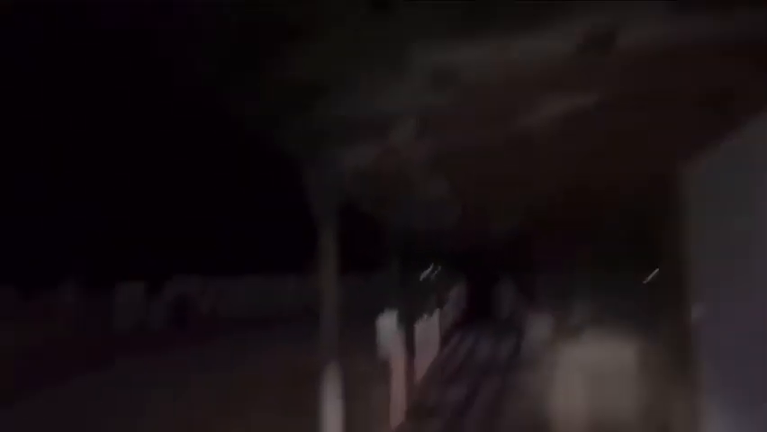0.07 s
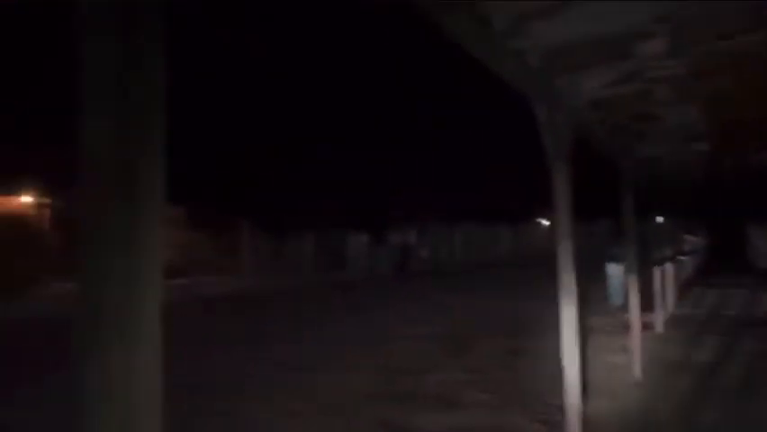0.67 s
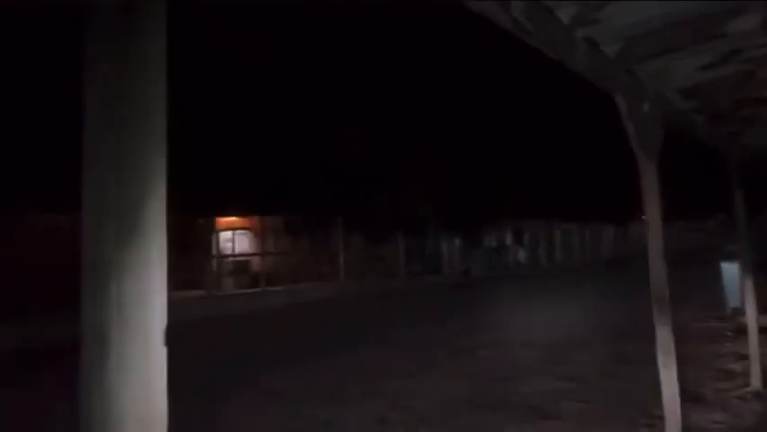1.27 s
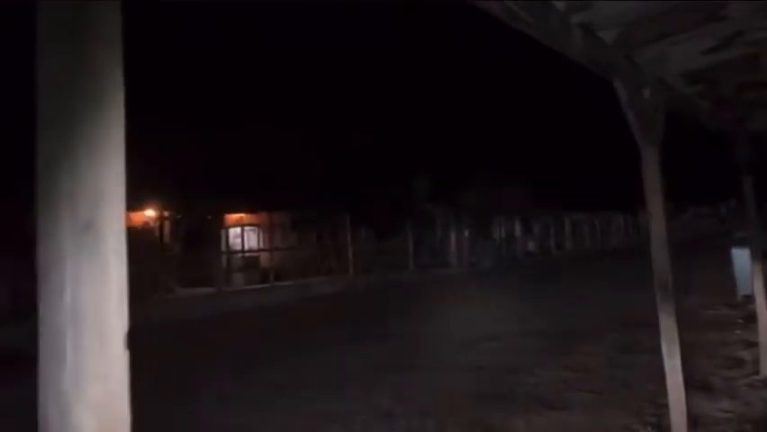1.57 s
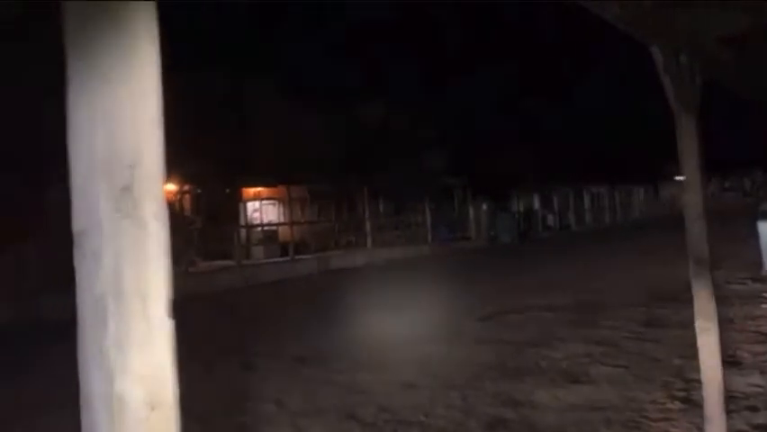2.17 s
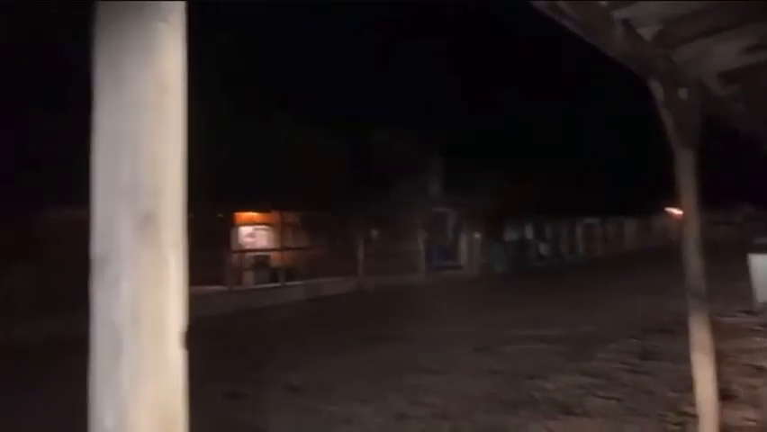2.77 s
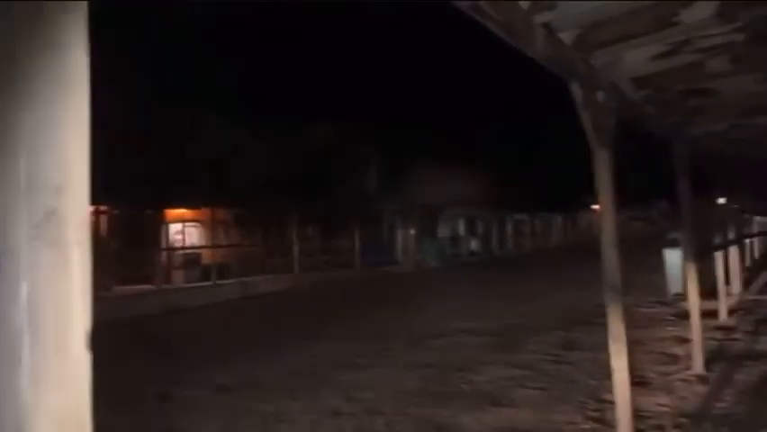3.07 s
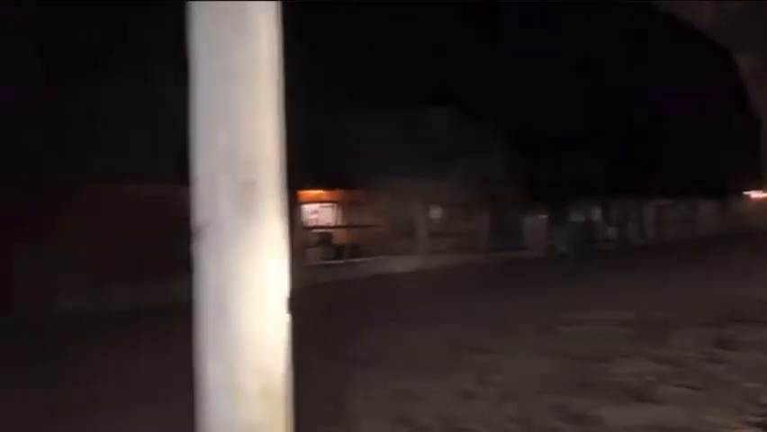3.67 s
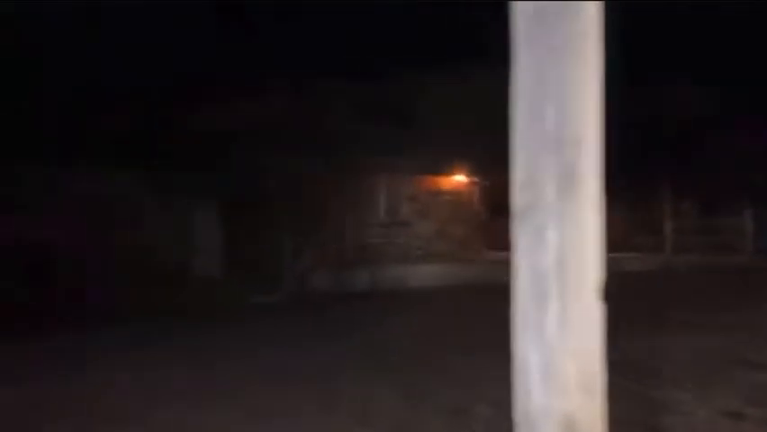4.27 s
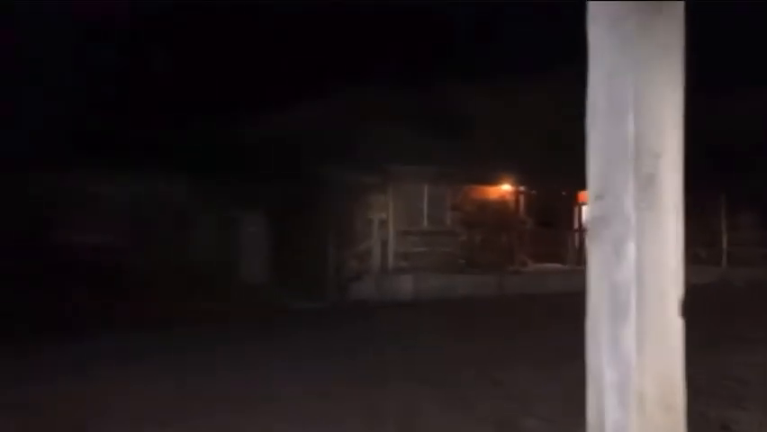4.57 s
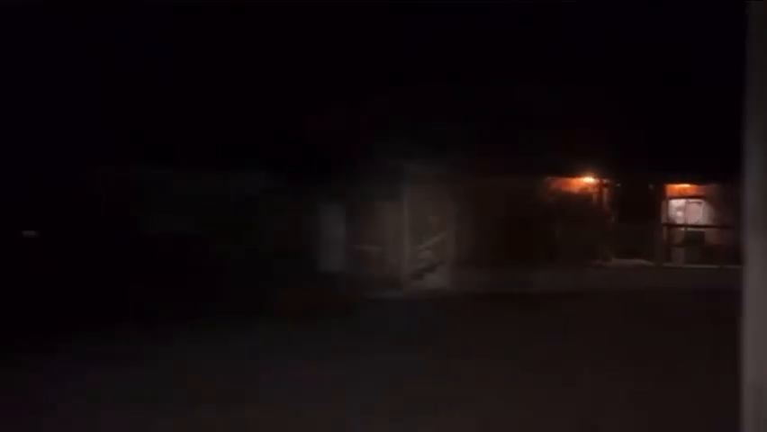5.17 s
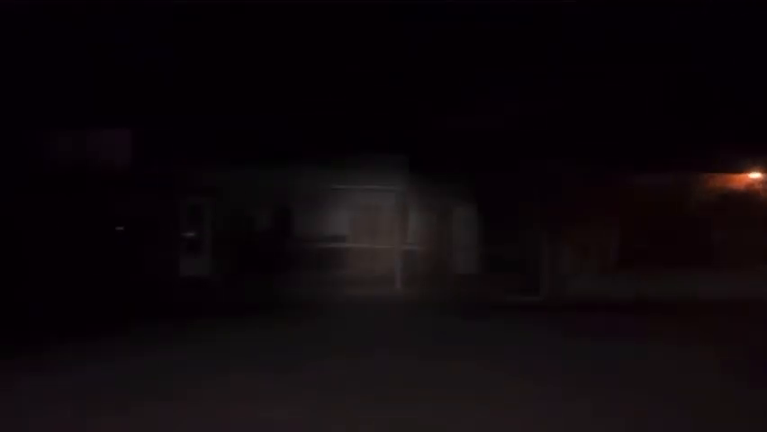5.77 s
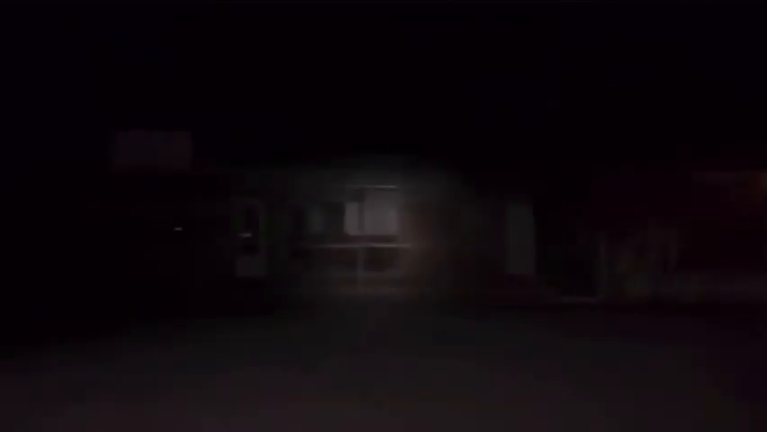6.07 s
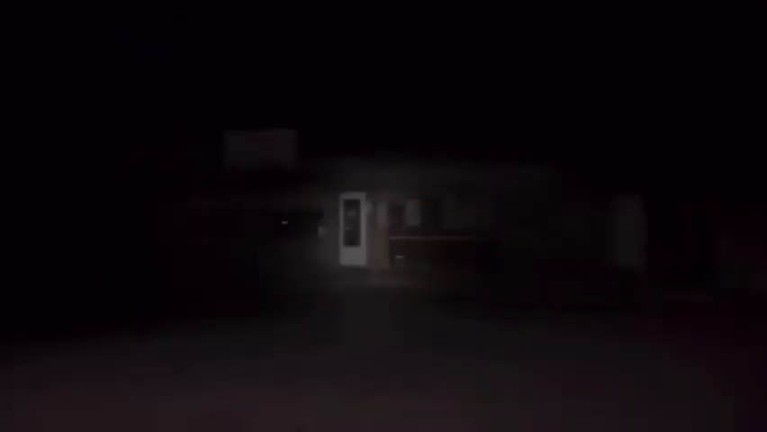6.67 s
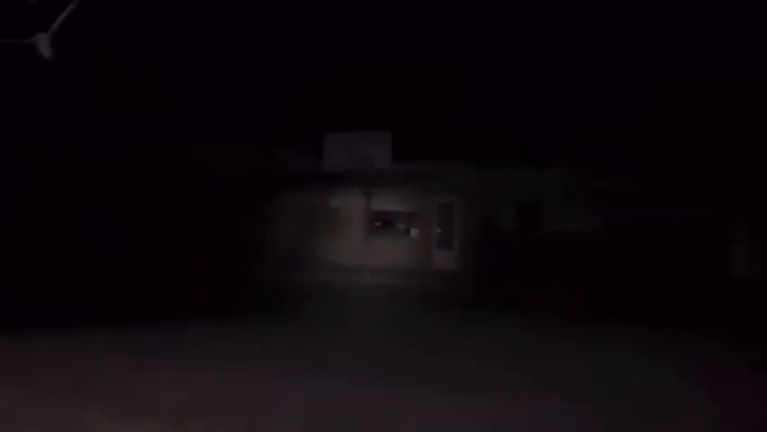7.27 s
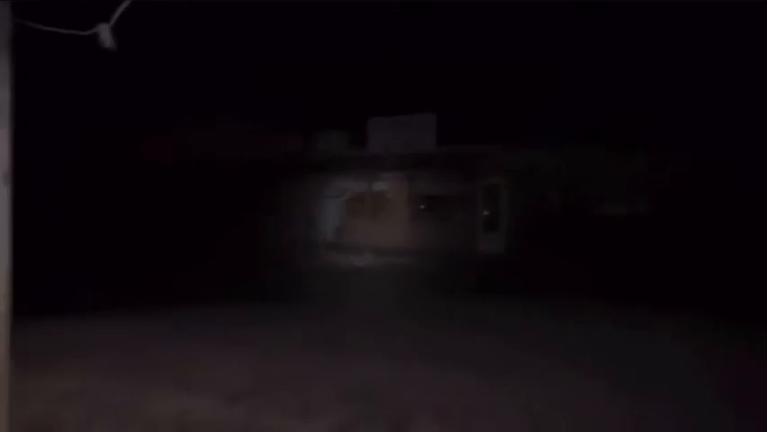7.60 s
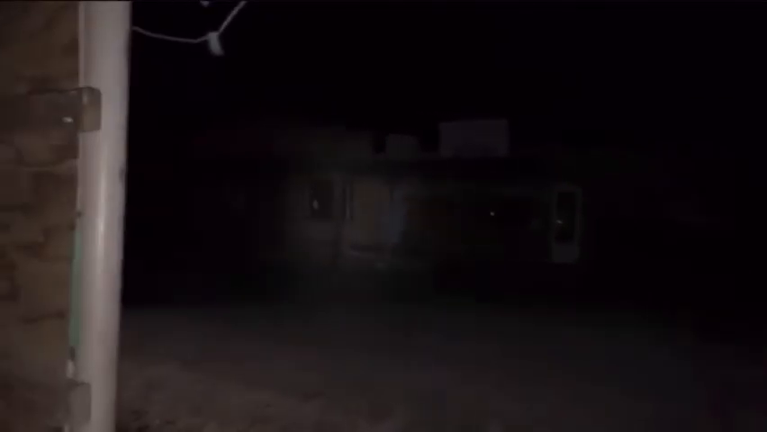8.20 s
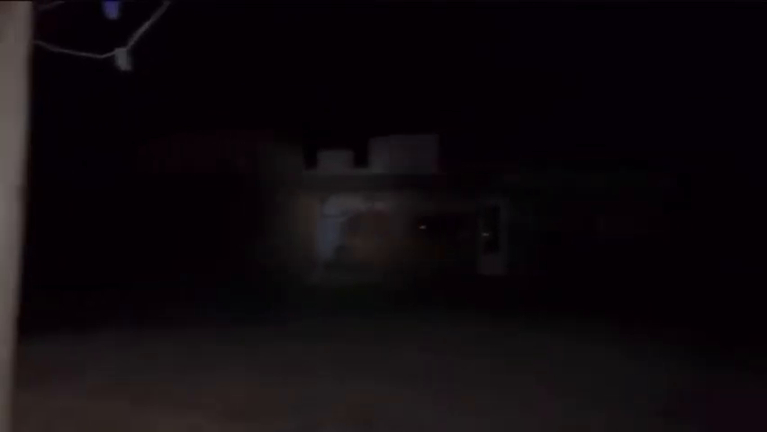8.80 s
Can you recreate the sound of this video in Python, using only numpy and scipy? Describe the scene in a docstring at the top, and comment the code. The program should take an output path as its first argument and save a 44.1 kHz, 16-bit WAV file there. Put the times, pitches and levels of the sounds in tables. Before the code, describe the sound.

Outdoors on a quiet night, a handheld microphone sputters with close electrical clicks, short rattles and a few soft thumps over low rumble. A shoe rasps on sandy ground near the start. The crackling stays dense for more than half the time, then breaks off into a few lone clicks, while the hand shifts with a deep rumble and a far cricket trills very faintly.

```python
"""On a quiet porch at night, over low rumble and faint hiss, a hand shifts and a microphone starts to
crackle. Each click is an electrical discharge, a dry spike that leaves the signal sagging; now and then
the bias jumps with a dull pop. From one second on, shoes give a few gritty scuffs by friction.
Past the middle a far cricket begins to trill, and the crackle thins out to a few clicks,
leaving the cricket, deep wobbles of the hand and faint last scuffs."""
import sys
import numpy as np
from scipy import signal
from scipy.fft import rfft, irfft, next_fast_len
from scipy.io import wavfile

SR = 44100
rng = np.random.default_rng(int(sys.argv[2]) if len(sys.argv) > 2 else 0)


def materialize(psi):
    """Save the field psi as 16-bit PCM at rate SR to the path in sys.argv[1].

    A 1-D psi becomes a single channel; in a 2-D psi each row is a channel.
    """
    bounded = np.clip(np.atleast_2d(psi).T, -1, 1)
    quanta = np.round(bounded * 32767).astype(np.int16)
    wavfile.write(sys.argv[1], SR, quanta)


N = 394254
TIME = np.arange(N) / SR
BAND_LIMIT_HZ = 11413


def amp(db):
    """Amplitude ratio of a level in decibels."""
    return 10 ** (np.asarray(db) / 20)


def unit(x):
    """Normalisation to an rms of one."""
    return x / np.sqrt(np.mean(x ** 2) + 1e-20)


def level(rows):
    """Amplitude envelope interpolated through rows of t/s, level/dB."""
    return amp(np.interp(TIME, *np.transpose(rows)))


def swells(rows):
    """Superposed Gaussian envelopes from rows of t/s, level/dB, half-width/s."""
    return sum(amp(db) * np.exp(-((TIME - at) / half) ** 2) for at, db, half in rows)


def colour(x, points):
    """Spectral shaping by a response given as rows of f/Hz, gain/dB."""
    hz, db = np.transpose(points)
    size = next_fast_len(N + 8192)
    bins = np.fft.rfftfreq(size, 1 / SR)
    response = amp(np.interp(np.log(bins + 1), np.log(hz + 1), db))
    return irfft(rfft(x, size) * response, size)[:N]


def impulses(times, heights):
    """Impulse train with one sample per event."""
    return np.bincount(np.clip(np.round(times * SR).astype(int), 0, N - 1), heights, N)


def leak(x, seconds):
    """Leaky integration: each impulse becomes a step that decays exponentially."""
    return signal.lfilter([1], [1, -np.exp(-1 / (seconds * SR))], x)


def build_up(x, seconds):
    """Time-reversed decay: each impulse becomes an exponential rise that ends at once."""
    return leak(x[::-1], seconds)[::-1]


# Spectrum of night air and handling rumble: f/Hz, density level/dB
RUMBLE_SPECTRUM = [(5, -2.5), (14, -2.5), (24, -5), (48, -18.5), (75, -16.5), (90, -22), (125, -19),
                   (165, -31), (210, -35), (240, -27.5), (320, -39), (410, -34.5), (600, -49), (2000, -80)]
# Envelope of the rumble: t/s, level/dB
RUMBLE_LEVELS = [(0, -37), (.35, -38), (.7, -41.5), (1.1, -36.5), (1.5, -39.5), (3, -39), (4, -37),
                 (5, -39), (6.2, -39.5), (6.7, -38), (7.8, -38.5), (8.94, -41)]
def rumble():
    """Night air and handling give random noise with its power at low frequencies."""
    return level(RUMBLE_LEVELS) * unit(colour(rng.standard_normal(N), RUMBLE_SPECTRUM))


# Spectrum of the hiss: f/Hz, density level/dB
HISS_SPECTRUM = [(100, 2.5), (700, 3), (1200, -1), (2200, -6.5), (4000, -10), (7000, -12), (10000, -14)]
# Envelope of the hiss: t/s, level/dB
HISS_LEVELS = [(0, -65.5), (2, -68.5), (4, -68), (5.5, -69), (6.6, -68.5), (7.3, -68.5), (8, -66),
               (8.94, -67)]
def hiss():
    """The microphone's self-noise is broadband and nearly stationary."""
    return level(HISS_LEVELS) * unit(colour(rng.standard_normal(N), HISS_SPECTRUM))


# Shifts of the hand: t/s, level/dB, half-width/s
HAND_SHIFTS = [(.17, -35, .06), (1.24, -33, .08), (6.8, -33, .3), (7.55, -38, .3), (8.25, -42, .2)]
# Spectrum of the wobble: f/Hz, density level/dB
WOBBLE_SPECTRUM = [(2, -4.5), (6, 0), (14, -4.5), (30, -20), (70, -32), (200, -58), (1000, -100)]
def handling():
    """Structure-borne noise: deep wobbles swell and fade as the hand moves."""
    return swells(HAND_SHIFTS) * unit(colour(rng.standard_normal(N), WOBBLE_SPECTRUM))


# Bursts of static, from a lone click to a short rattle:
# t/s, duration/s, spike count, relative level/dB, restrike delay of the first spike/s (0 for none)
STATIC_BURSTS = [(0.166, 0.0044, 2, -18.0, 0.00027), (0.1856, 0.0, 1, -19.5, 0.0),
                 (0.2, 0.0, 1, -18.5, 0.0), (0.2933, 0.0085, 2, -16.5, 0.00034),
                 (0.3145, 0.0, 1, -20.0, 0.0), (0.3449, 0.0, 1, -20.0, 0.00054),
                 (0.3779, 0.0106, 2, -18.5, 0.0), (0.4415, 0.0142, 3, -19.0, 0.00034),
                 (0.6093, 0.0133, 5, -18.0, 0.0006), (0.6384, 0.0, 1, -21.5, 0.0),
                 (0.7763, 0.0189, 5, -17.5, 0.0), (0.8139, 0.0021, 2, -20.0, 0.0),
                 (0.8555, 0.0193, 5, -18.5, 0.0), (0.8921, 0.0206, 4, -19.5, 0.0),
                 (0.9263, 0.0018, 2, -20.0, 0.0), (0.9719, 0.003, 3, -19.5, 0.00045),
                 (1.0131, 0.0106, 3, -19.5, 0.00032), (1.1922, 0.0172, 6, -20.0, 0.00023),
                 (1.2451, 0.0254, 4, -18.0, 0.00039), (1.2843, 0.0022, 2, -23.0, 0.0),
                 (1.311, 0.0, 1, -20.0, 0.00025), (1.4636, 0.0099, 3, -20.5, 0.0),
                 (1.492, 0.0195, 3, -19.0, 0.0), (1.5665, 0.0049, 2, -18.5, 0.0),
                 (1.5882, 0.0, 1, -16, 0.0), (1.6081, 0.0181, 4, -18.5, 0.0),
                 (1.6397, 0.0079, 3, -22.5, 0.0), (1.6781, 0.0, 1, -23.0, 0.0),
                 (1.6913, 0.0094, 3, -20.5, 0.0), (1.8872, 0.0088, 3, -19.0, 0.00014),
                 (1.9086, 0.0019, 2, -23.5, 0.0), (1.927, 0.0064, 3, -22.0, 0.0),
                 (1.9528, 0.0039, 2, -20.0, 0.0), (1.9895, 0.0034, 2, -20.0, 0.0),
                 (2.0076, 0.0035, 2, -22.0, 0.0), (2.06, 0.0087, 3, -20.5, 0.0),
                 (2.0942, 0.0022, 2, -20.5, 0.0), (2.1137, 0.0026, 2, -21.5, 0.0),
                 (2.1359, 0.0034, 2, -20.5, 0.0), (2.2782, 0.0088, 4, -21.0, 0.00036),
                 (2.3022, 0.0098, 3, -21.5, 0.0), (2.3759, 0.0, 1, -20.5, 0.00054),
                 (2.4014, 0.0103, 3, -20.0, 0.0), (2.4414, 0.0, 1, -22.0, 0.0),
                 (2.4594, 0.0031, 2, -20.0, 0.0), (2.5771, 0.0, 1, -21.0, 0.00016),
                 (2.5913, 0.0, 1, -22.5, 0.0), (2.618, 0.0, 1, -20.5, 0.00016),
                 (2.6336, 0.0046, 3, -21.5, 0.0), (2.6637, 0.0, 1, -22.5, 0.00025),
                 (2.729, 0.0076, 2, -19.5, 0.0), (2.7652, 0.0227, 5, -20.5, 0.0),
                 (2.8692, 0.0, 1, -23.0, 0.00023), (2.9114, 0.0, 1, -25.0, 0.0), (2.9279, 0.0, 1, -20, 0.0),
                 (3.0102, 0.0, 1, -20.0, 0.0002), (3.0253, 0.0, 1, -23.5, 0.00036),
                 (3.0867, 0.0, 1, -21.5, 0.0), (3.0993, 0.0033, 2, -21.0, 0.0),
                 (3.1174, 0.0031, 2, -21.0, 0.0), (3.1614, 0.0, 1, -19.0, 0.0),
                 (3.1743, 0.0042, 2, -21.0, 0.0), (3.1919, 0.0, 1, -19.5, 0.0),
                 (3.2103, 0.0, 1, -21.5, 0.0), (3.3339, 0.003, 2, -19.0, 0.0),
                 (3.449, 0.0109, 2, -21.5, 0.0), (3.4754, 0.0172, 4, -19.5, 0.0),
                 (3.5411, 0.0, 1, -18.5, 0.0), (3.569, 0.0, 1, -26, 0.0), (3.5884, 0.0082, 2, -19.0, 0.0),
                 (3.6308, 0.0151, 3, -19.5, 0.0), (3.6766, 0.0075, 2, -19.5, 0.0),
                 (3.7082, 0.0, 1, -17.5, 0.0), (3.7248, 0.0235, 4, -21.0, 0.0),
                 (3.7708, 0.0, 1, -19.0, 0.0), (3.7827, 0.0, 1, -21.0, 0.0),
                 (3.8194, 0.0049, 2, -18.0, 0.0), (3.8675, 0.0098, 2, -16.5, 0.0),
                 (3.8991, 0.0, 1, -20.5, 0.0), (3.9172, 0.0076, 2, -19.0, 0.0), (3.978, 0.0, 1, -22.5, 0.0),
                 (3.9927, 0.0, 1, -20.0, 0.0), (4.0829, 0.0364, 9, -18.0, 0.0),
                 (4.1324, 0.0028, 2, -20.0, 0.0), (4.1776, 0.0, 1, -22.5, 0.0),
                 (4.2566, 0.0, 1, -24.0, 0.0), (4.2932, 0.0, 1, -17, 0.0), (4.315, 0.0, 1, -22.0, 0.0),
                 (4.3519, 0.0, 1, -18.5, 0.0), (4.3813, 0.0, 1, -19.5, 0.0),
                 (4.4015, 0.0102, 3, -15.0, 0.0), (4.481, 0.0128, 5, -19.0, 0.0),
                 (4.5453, 0.0017, 2, -20.0, 0.0), (4.5778, 0.0, 1, -19.0, 0.0),
                 (4.5895, 0.0047, 2, -20.5, 0.0), (4.6064, 0.0, 1, -20.0, 0.0),
                 (4.6259, 0.0019, 2, -18.5, 0.0), (4.6544, 0.0, 1, -14.5, 0.0),
                 (4.7021, 0.0064, 2, -13.5, 0.0), (4.9572, 0.0078, 4, -17.0, 0.0),
                 (4.9883, 0.0224, 8, -18.0, 0.00039), (5.0407, 0.0203, 4, -17.0, 0.0),
                 (5.0824, 0.0087, 2, -19.0, 0.0), (5.109, 0.0, 1, -15.5, 0.0), (5.2986, 0.0, 1, -13.0, 0.0),
                 (5.3268, 0.0031, 2, -14.5, 0.00016), (5.342, 0.0, 1, -14.0, 0.0),
                 (5.3683, 0.0241, 6, -17.5, 0.0), (5.4083, 0.0252, 5, -16.0, 0.0),
                 (5.4452, 0.0, 1, -19.0, 0.0), (5.4568, 0.0, 1, -17.0, 0.0), (5.4703, 0.0, 1, -19.5, 0.0),
                 (5.496, 0.0099, 3, -17.5, 0.0), (5.5184, 0.0102, 3, -17.0, 0.0),
                 (6.2617, 0.004, 3, -14.5, 0.0), (6.2837, 0.015, 4, -14.5, 0.0), (6.999, 0.0, 1, -8.5, 0.0),
                 (7.8492, 0.0058, 2, -21.5, 0.0)]
def discharges(max_spikes=12, gap_spread_db=6, later_db=-2.1, later_spread_db=1.8,
               restrike_chance=.22, restrike_s=.00033):
    """Clustered point process: bursts split into uneven spikes. Gives t/s, level/dB, restrike delay/s."""
    gaps, heights = rng.standard_normal((len(STATIC_BURSTS), max_spikes, 2)).T
    lucks, delays = rng.random((len(STATIC_BURSTS), max_spikes, 2)).T
    spikes = []
    for i, (start, length, count, db, first_delay) in enumerate(STATIC_BURSTS):
        k = np.arange(round(count))
        later = k > 0
        place = np.cumsum(later * amp(gap_spread_db * gaps[k, i]))
        times = start + length * place / (place[-1] + 1e-9)
        levels = db + later * (later_db + later_spread_db * np.clip(heights[k, i], -2, 2))
        later_delay = restrike_s * (.5 + delays[k, i]) * (lucks[k, i] < restrike_chance)
        spikes.append([times, levels, np.where(later, later_delay, first_delay)])
    return np.hstack(spikes)


def strikes(times, height, delay, shares=(.88, .68, .3)):
    """Comb filtering: a spike with a delay strikes three times, ever weaker, and sounds snappy or hollow."""
    split = height * (delay > 0)
    first = impulses(times, height - (1 - shares[0]) * split)
    second = impulses(times + delay, shares[1] * split)
    third = impulses(times + 2 * delay, shares[2] * split)
    return first + second + third


# Colour of the static: f/Hz, gain/dB
STATIC_SPECTRUM = [(30, -3.5), (200, 3.5), (600, 2), (1500, 2.5), (3000, 2.5), (6000, 3.5), (10000, 5)]
def static(times, db, delay, spike_gain_db=4.1, sharp_above_db=-12, blunt_range_db=22,
           sag_db=-36, sag_spread_db=5, sag_eases_above_db=-19):
    """Electrical breakdown: charge builds, collapses in a spike and leaves a sag that drains away."""
    blunt_scatter, sag_scatter = rng.uniform(-1, 1, (len(times), 2)).T
    charge = .033 * build_up(impulses(times, amp(db)), seconds=.00091)
    # Weak spikes are blunter.
    bluntness = np.clip((sharp_above_db - db) / blunt_range_db + .25 * blunt_scatter, 0, 1)
    sharp = build_up(strikes(times, amp(db) * (1 - bluntness), delay), seconds=.000024)
    blunt = build_up(strikes(times, amp(db) * bluntness, delay), seconds=.00007)
    spikes = amp(spike_gain_db) * (sharp + .66 * blunt)
    # The sag is of much the same depth throughout, but shallower after the sharpest spikes.
    depth = amp(sag_db - np.maximum(db - sag_eases_above_db, 0) + sag_spread_db * sag_scatter)
    sag = leak(impulses(times + delay, depth), seconds=.0056)
    return colour(spikes + charge - sag, STATIC_SPECTRUM)


def ticks(times, tick_db=-36, spread_db=4, scatter_s=.003, chance=.5):
    """Faint secondary discharges scatter within a few milliseconds of the spikes."""
    offset, size = np.clip(rng.standard_normal((len(times), 2)), -2, 2).T
    heights = amp(tick_db + spread_db * size) * (rng.random(len(times)) < chance)
    return build_up(impulses(times + scatter_s * (offset + .5), heights), seconds=.00007)


# Spells of frying between the spikes: t/s, level/dB, half-width/s
FRYING_SPELLS = [(0.89, -58, 0.025), (2.772, -41, 0.0059), (2.789, -39.5, 0.0028), (3.178, -48, 0.012),
                 (3.783, -62, 0.023), (4.11, -45.5, 0.022), (5.046, -46, 0.013), (5.386, -44, 0.014),
                 (5.423, -47.5, 0.019), (5.51, -53.5, 0.039), (6.291, -42, 0.01)]
def fizz(times, fizz_db=-53.5, grain_db=3, dull_hz=2200):
    """Modulated noise: a short, soft fizz swells and fades around each click, at times a duller frying."""
    triggers = impulses(times, np.ones(len(times)))
    envelope = np.sqrt(build_up(triggers, seconds=.0023) + leak(triggers, seconds=.0033))
    grains = rng.standard_normal(N) * amp(grain_db * np.minimum(rng.exponential(1, N), 5))
    fizzing = unit(colour(grains, [(150, 7), (dull_hz, 0), (BAND_LIMIT_HZ, -7)]))
    frying = unit(colour(grains, [(150, 6), (dull_hz, 0), (4000, -8), (BAND_LIMIT_HZ, -13)]))
    return amp(fizz_db) * envelope * fizzing + swells(FRYING_SPELLS) * frying


# Jumps of the microphone's bias: t/s, time to the drop/s, rise/full scale, drop/full scale, edge time/s
BIAS_JUMPS = [(.2, 0.024, .005, 0.054, .00022), (2.3643, .0122, 0.029, 0.04, .00005),
              (3.1704, 0.013, 0.051, 0.056, .00007), (3.7927, 0.071, .12, .11, .00002),
              (4.1164, .0082, .055, .11, .00007), (4.22, .0105, .005, .021, .00004),
              (4.6768, .0702, .05, 0.056, .00007), (5.33, .0094, 0.057, 0.061, .00007),
              (5.626, .0048, 0.035, 0.063, .00002), (5.9935, 0.0071, .043, .08, .000032)]
def pops(drain_s=.064):
    """Step response: the bias jumps, drops and relaxes in a thump, with a tick if its edges are sharp."""
    t = np.arange(SR // 2) / SR
    out = np.zeros(N + len(t))
    for start, held, rise, drop, edge_s in BIAS_JUMPS:
        step = np.exp(-t / drain_s) - np.exp(-t / edge_s)
        out[round(start * SR):][:len(t)] += rise * step
        out[round((start + held) * SR):][:len(t)] -= drop * step
    return out[:N]


def crunch(spectrum, grains_per_s, grain_db, rub):
    """Shot noise of separate grains mixed with the Gaussian noise of a smooth rub."""
    sizes = rng.choice([-1, 1], N) * amp(grain_db * np.minimum(rng.exponential(1, N), 4))
    grains = unit(sizes * (rng.random(N) < grains_per_s / SR))
    return unit(colour(grains + rub * rng.standard_normal(N), spectrum))


# Spectrum of a rasping sole: f/Hz, gain/dB
SOLE_SPECTRUM = [(100, -26), (450, -12), (690, -5.5), (850, -10.5), (1100, -2.5), (1300, 0), (1550, -3),
                 (1840, -7), (2060, -25), (2400, -15), (3200, -28), (3800, -21.5), (10000, -42)]
# Spectrum of loose sand underfoot: f/Hz, gain/dB
SAND_SPECTRUM = [(100, 0), (400, 6), (900, -2.5), (2400, -1.5), (3200, -7.5), (4200, -10), (6000, -10),
                 (10000, -15)]
# Shoes on grit: t/s at the peak, level/dB, fall time/s, sole's share of the power (0-1)
SHOE_SCUFFS = [(1.06, -52, 0.053, .64), (1.461, -56.5, 0.082, .54), (1.702, -40, .013, .7),
               (1.728, -35, .009, .97), (1.743, -35, .009, 0.91), (1.766, -42, 0.033, 0.75),
               (1.86, -63.5, .14, .4), (4.04, -61, 0.082, 0), (6.125, -68, .06, .2), (6.23, -70, .04, .3),
               (6.322, -66, .03, .3), (7.445, -70, .02, .9), (7.575, -64, .05, .7), (7.87, -60, .07, 0.1),
               (8.098, -59, 0.028, 0.7), (8.183, -64, .012, .9), (8.85, -65.5, .03, .8)]
def scuffs(rise_per_fall=.39):
    """Sliding friction: each scuff swells and fades, a mix of rasping sole and shifting sand."""
    sole = crunch(SOLE_SPECTRUM, grains_per_s=450, grain_db=4.5, rub=.72)
    sand = crunch(SAND_SPECTRUM, grains_per_s=1500, grain_db=1.5, rub=.8)
    out = np.zeros(N)
    for peak_s, db, fall, share in SHOE_SCUFFS:
        rise = rise_per_fall * fall
        near = slice(max(0, round((peak_s - 4 * rise) * SR)), round((peak_s + 4 * fall) * SR))
        t = TIME[near] - peak_s
        force = amp(db) * np.exp(-np.maximum(-t / rise, t / fall) ** 1.1)
        out[near] += force * (np.sqrt(share) * sole[near] + np.sqrt(1 - share) * sand[near])
    return out


# Trills of a far cricket: t/s, duration/s
CRICKET_TRILLS = [(4.7, .16), (5.13, .16), (5.682, .22), (6, .2), (6.34, 0.15), (6.8, .18), (7.1, .14),
                  (7.3, .16), (7.58, .18), (8.16, .16), (8.4, 0.22), (8.68, .16)]
def cricket(pitch_hz=5200, half_band_hz=90, level_db=-84.3):
    """Narrow-band noise: short trills, blurred by distance, as a randomly modulated carrier."""
    gate = sum(np.sin(np.pi * np.clip((TIME - start) / length, 0, 1)) for start, length in CRICKET_TRILLS)
    lowpass = signal.butter(3, half_band_hz, fs=SR, output="sos")
    blur = signal.sosfilt(lowpass, rng.standard_normal((2, N)))
    phase = 2 * np.pi * pitch_hz * TIME
    band = unit(blur[0] * np.sin(phase) + blur[1] * np.cos(phase))
    return amp(level_db) * np.sqrt(abs(gate)) * band


def scene():
    """Superposition in one channel; the static arises in the microphone itself, so it has no echo."""
    times, db, delay = discharges()
    crackle = static(times, db, delay) + ticks(times) + fizz(times) + pops()
    background = scuffs() + rumble() + hiss() + handling() + cricket()
    return (crackle + background)[None]


# The treble falls away steeply above 10 kHz: f/Hz, gain/dB
TREBLE_ROLL_OFF = [(20, 0), (10000, 0), (10300, -15), (10800, -29), (11400, -39), (13000, -58)]
def record(dry):
    """Band limiting: steep low-pass filters remove the top and ring briefly after every spike."""
    lowpass = signal.butter(12, 11000, fs=SR, output="sos")
    ringing = signal.sosfilt(lowpass, colour(dry[0], TREBLE_ROLL_OFF))
    band_limit = signal.firwin(301, BAND_LIMIT_HZ, window=("kaiser", 6), fs=SR)
    return signal.oaconvolve(ringing, band_limit, "same")[None]


dry = scene()
out = record(dry)
materialize(out)
```